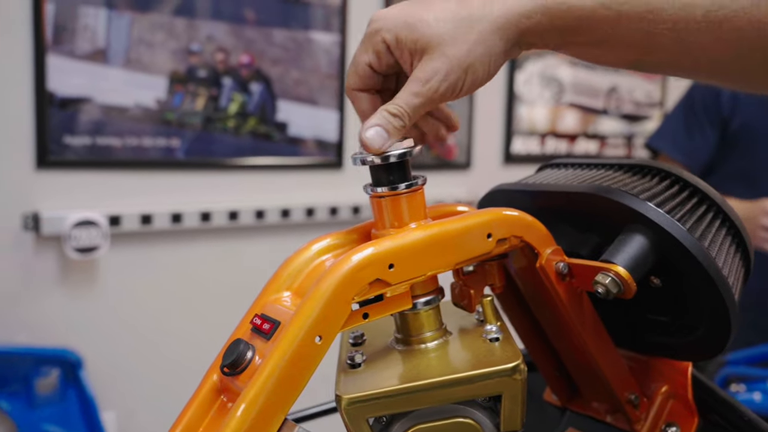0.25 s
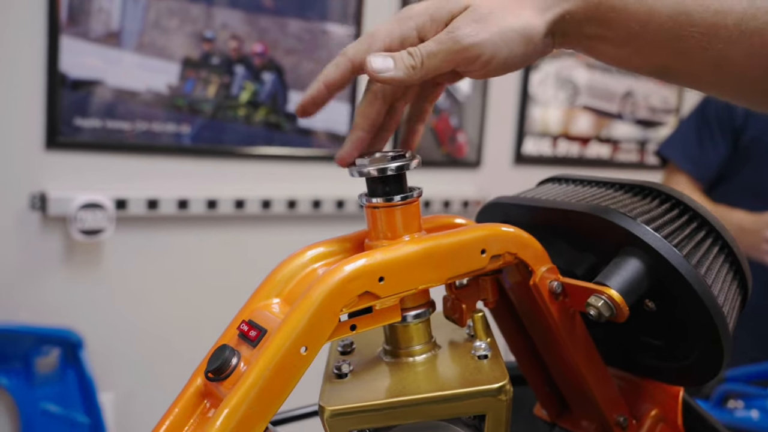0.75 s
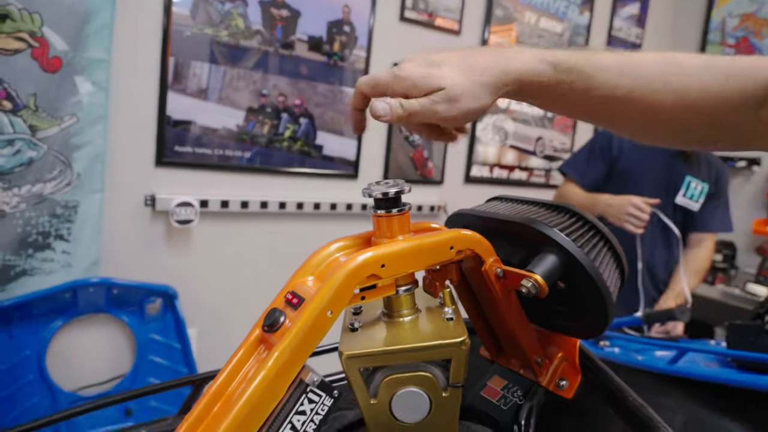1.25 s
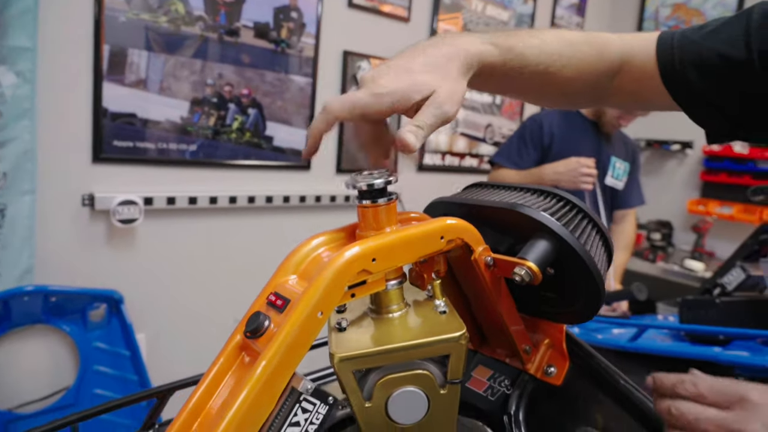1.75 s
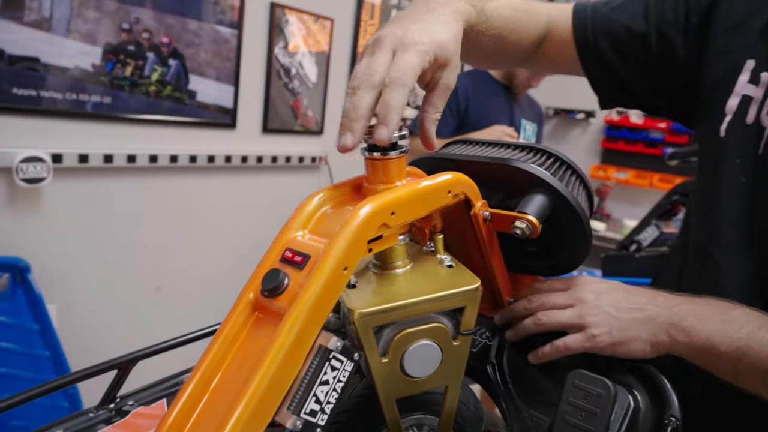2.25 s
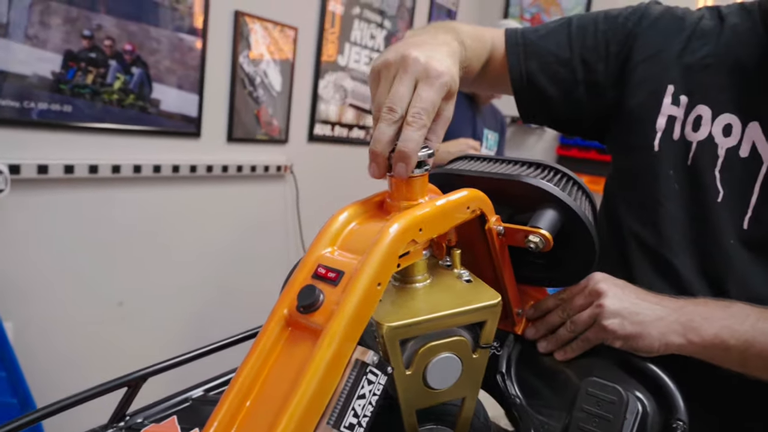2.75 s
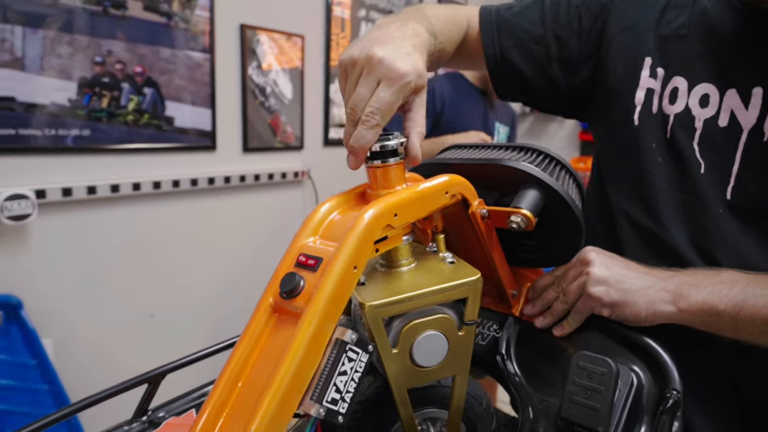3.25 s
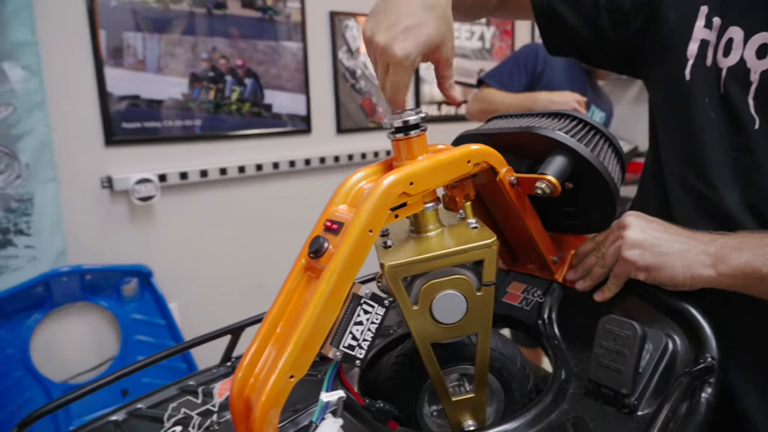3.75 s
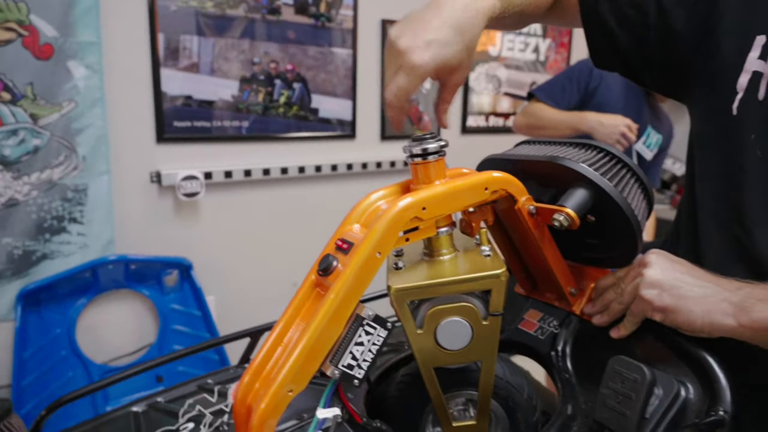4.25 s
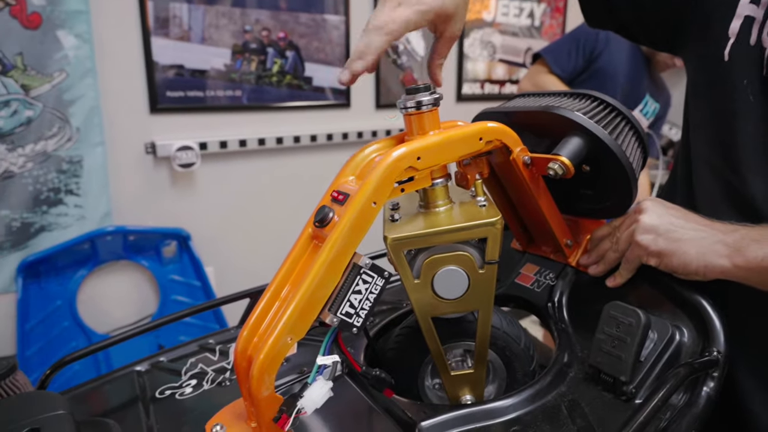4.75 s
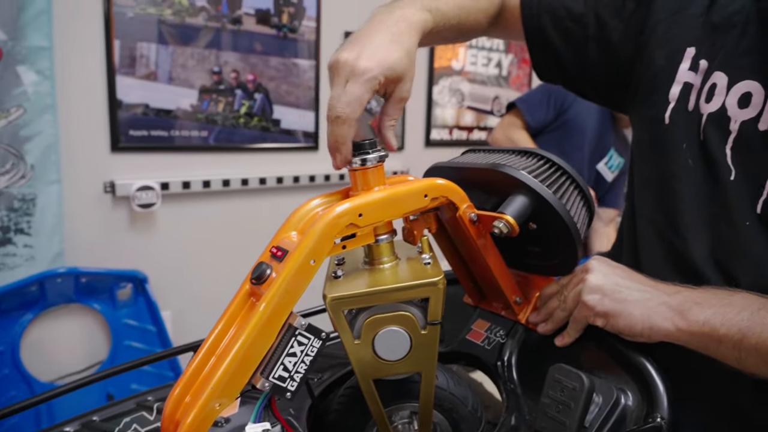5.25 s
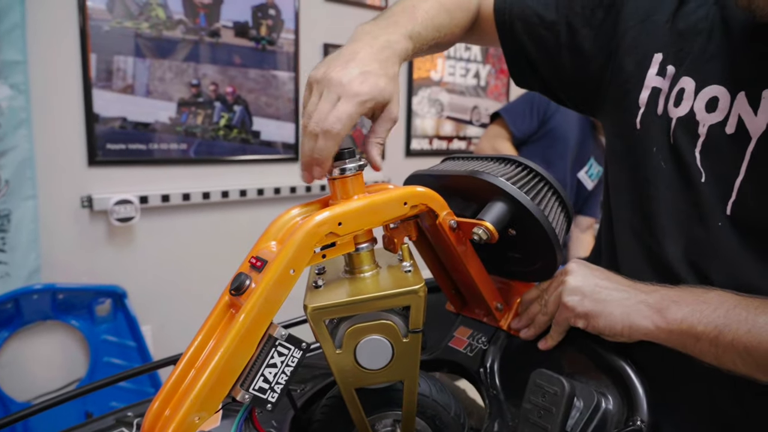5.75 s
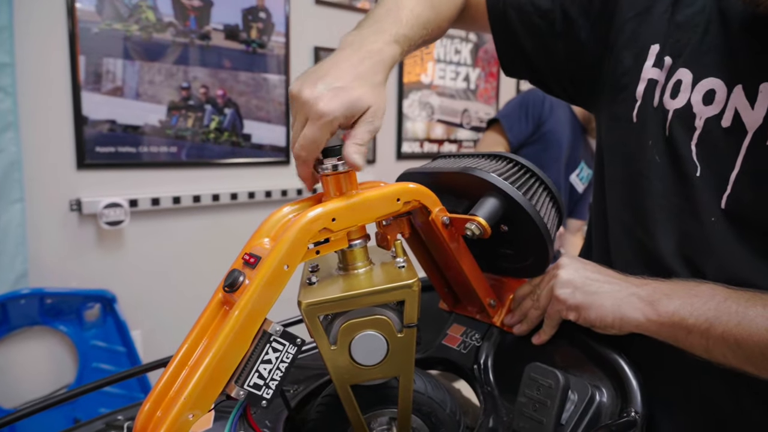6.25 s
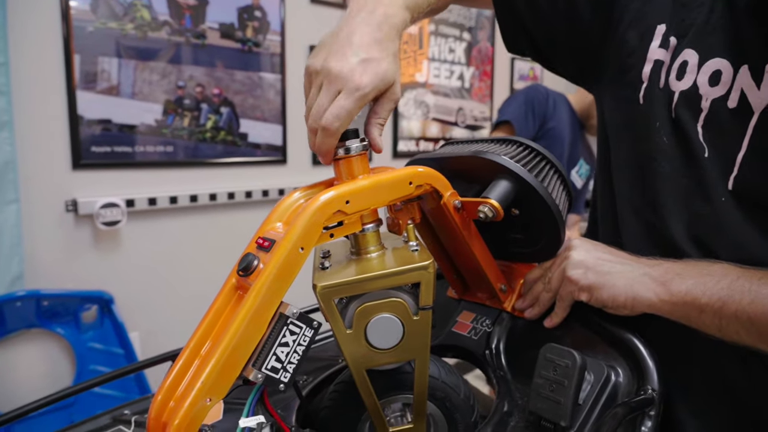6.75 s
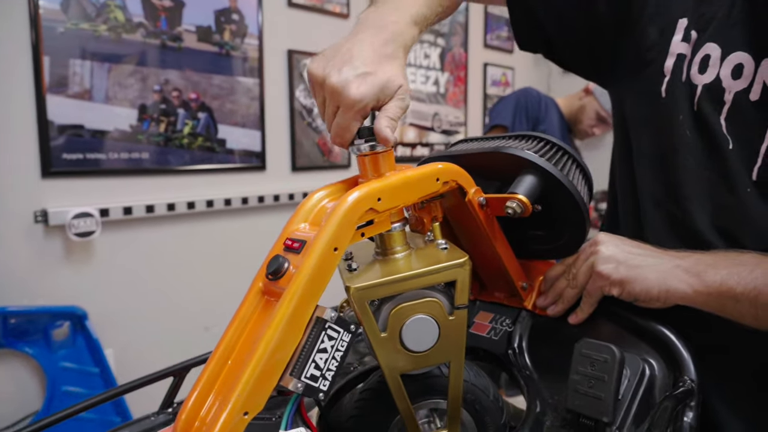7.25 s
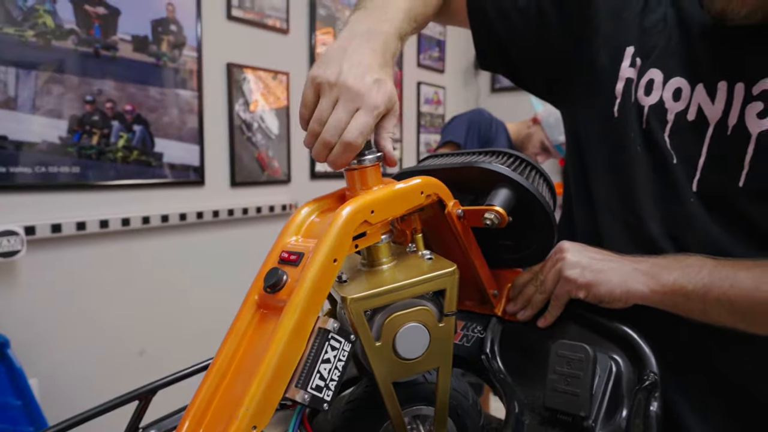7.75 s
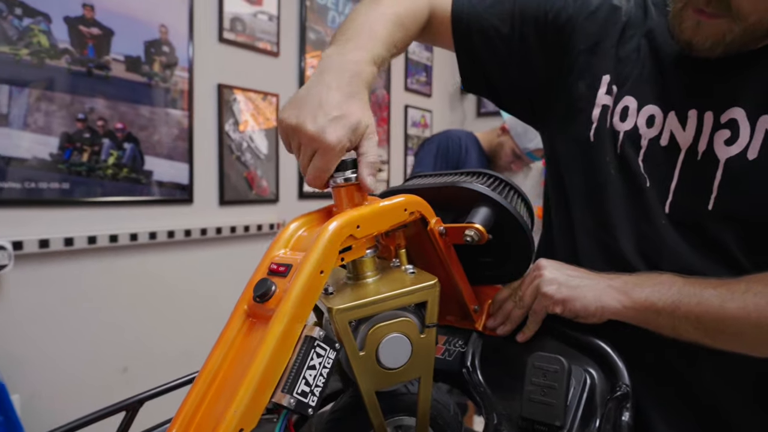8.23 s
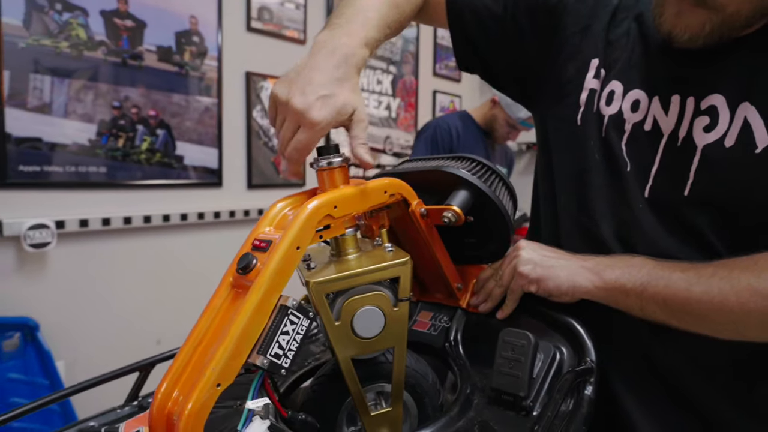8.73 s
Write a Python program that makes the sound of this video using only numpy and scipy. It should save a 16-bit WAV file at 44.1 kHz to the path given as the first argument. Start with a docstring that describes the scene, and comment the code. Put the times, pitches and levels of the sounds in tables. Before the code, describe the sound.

Loose metallic clacks and rattling, rasping spins of a nut on a shaft give way to dull gripped rubs, small squeaks and frame thumps.

```python
"""In a small workshop, a steel nut is spun down a greased threaded shaft on a kart frame.
Flicked, it clacks in the play of its thread and coasts with a fine rasp; later it is turned
in short gripped strokes that rub, squeak and thump through the frame.
Impacts and random grains drive resonances of nut, skin and frame; squeaks are gliding noise bands.
Wall reflections are added, over a steady air noise, a distant fan and a late hum."""
import sys
import numpy as np
from scipy import signal
from scipy.fft import rfft, irfft, next_fast_len
from scipy.io import wavfile
from scipy.ndimage import uniform_filter1d, map_coordinates

SR = 44100
rng = np.random.default_rng(int(sys.argv[2]) if len(sys.argv) > 2 else 0)


def transcribe(signal):
    """Save signal, clipped to [-1, 1], as a 16-bit WAV file at the path in sys.argv[1]."""
    frames = np.atleast_2d(signal).T
    limited = np.clip(frames, -1, 1)
    pcm = np.round(limited * 32767).astype(np.int16)
    wavfile.write(sys.argv[1], SR, pcm)


N = 396263
TIME_S = np.arange(N) / SR
BINS_HZ = np.fft.rfftfreq(8192, 1 / SR)

# Gripped strokes: t/s, length/s, skin rub level/dB, frame rumble level/dB, thread hiss level/dB
STROKES = [(0.045, 0.038, -38, -37, -50), (0.14, 0.073, -51, -45, -45), (0.22, 0.12, -38.5, -39.5, -42),
           (2.5, 0.11, -56, -51, -55), (2.82, 0.14, -50.5, -55, -62), (3.11, 0.066, -49, -38.5, -60),
           (3.215, 0.15, -59, -75, -54), (3.34, 0.078, -64, -65, -43), (5.195, 0.042, -44, -54, -40),
           (5.435, 0.081, -48, -39.5, -52), (5.56, 0.069, -41.5, -45.5, -40.5), (5.67, 0.17, -59, -68, -55),
           (5.8, 0.096, -38, -31.5, -43.5), (6.06, 0.11, -53, -38, -46), (6.32, 0.061, -41.5, -37.5, -64),
           (6.39, 0.16, -48, -40.5, -47.5), (6.745, 0.081, -37, -37, -41.5), (7.07, 0.13, -60, -45.5, -53),
           (7.16, 0.1, -45, -46.5, -46), (7.455, 0.078, -40, -36.5, -45.5), (7.72, 0.14, -55, -41.5, -52.5),
           (7.81, 0.091, -46.5, -43, -49.5), (8.1, 0.13, -53, -47.5, -58.5),
           (8.19, 0.11, -45.5, -36, -48.5), (8.555, 0.096, -36.5, -30, -48), (8.89, 0.045, -66, -42, -53.5)]
# Flicks that set the nut coasting: t/s, time until a finger stops it/s, rasp level/dB, rattle level/dB
FLICKS = [(0.16, .19, -51, -43), (0.535, 0.3, -45, -36.5), (0.777, 0.27, -43.5, -43),
          (0.99, 0.11, -61, -47), (1.225, 0.21, -41, -40), (1.47, 0.11, -42.5, -32), (1.75, 0.15, -47, -31),
          (1.99, 0.275, -42.5, -40.5), (3.521, 0.26, -43, -44), (3.74, 0.19, -47, -45),
          (3.952, .21, -45, -47.5), (4.16, 0.27, -44, -45.5), (4.392, 0.25, -44.5, -45),
          (4.615, 0.26, -47.5, -45), (4.83, 0.32, -47, -44)]
# Soft pushes of the hand on the frame, before common trim: t/s, level/dB, centre f/Hz
THUMPS = [(0.261, -20, 386), (1.766, -25.5, 223), (2.396, -28, 134), (3.123, -20, 270), (3.167, -15.5, 227),
          (3.745, -21.5, 275), (3.95, -18.5, 239), (4.395, -14.5, 270), (4.617, -15, 235), (4.83, -17, 251),
          (5.241, -19, 282), (6.114, -18.5, 274), (6.508, -23.5, 260), (7.515, -19, 250), (7.773, -26, 233),
          (7.87, -28, 230), (8.234, -28.5, 235)]
# Nut against thread flank, before common trims: t/s, level/dB, treble re level/dB, frame knock re level/dB
CLACKS = [(0.519, -29.5, -16, -4), (0.531, -14.5, -12, -5), (0.5706, -21, -7, -5), (0.607, -31, -3, -12),
          (0.6702, -22.5, -19, -4.5), (0.779, -21.5, -11, -4.5), (0.991, -20, -1, -4),
          (1.219, -23, -20, -2), (1.271, -22.5, -2, 0.5), (1.381, -25.5, -21, -25), (1.4697, -21, -5, -2),
          (1.5137, -22.5, 6, -4), (1.5424, -15.5, 7, -22), (1.5492, -6, -15, -34), (1.5568, -4.5, 1, -6),
          (1.7447, -10, -7.5, -11), (1.764, -11, -4.5, -7), (1.8294, -17, -24, -20), (1.8745, -22, -23, -9),
          (1.9832, -28, -8, 4), (1.9957, -19, -20, 1), (2.041, -19, -6, -25), (3.2247, -45.5, 14, 0),
          (3.5159, -20.5, -6.5, -4.5), (3.5745, -23, -29, -9), (3.74, -25, -5, -1), (3.9457, -13.5, 3, -9),
          (4.162, -24.5, -19, -1.5), (4.2053, -23.5, -29, -20), (4.4024, -21, -18, -0.5),
          (4.6142, -8.5, 1.5, -6), (4.8264, -9.5, -1, -9.5), (5.032, -15.5, 1, -1.5), (5.0807, -17, 2, -11),
          (5.0912, -14.5, -2.5, -1.5), (5.2371, -27, -11, 2.5), (5.676, -34, -24, -5),
          (5.803, -31.5, -16, 3), (5.826, -18.5, -14, -19), (6.0529, -17, -3.5, -4),
          (6.084, -11.5, -9, -25), (6.268, -23.5, -13, -7), (6.3365, -17, -9, -8), (6.39, -25, -26, -5),
          (6.4425, -27, -30, -15), (6.743, -31, -25, -9), (6.776, -23.5, -22, -7), (7.0658, -22, -13, -6),
          (7.1002, -16, 0, -12), (7.198, -35, -26, -11), (7.431, -36.5, -32, 0), (7.7198, -32.5, -9, -4),
          (8.094, -31.5, -23, 0.5)]
# Single nut modes after a clean flick: t/s, level/dB, f/Hz, time to fall by 66.6 dB/s
PINGS = [(1.5495, -5.5, 2010, 0.031), (1.56, -24.5, 9760, 0.15), (1.748, -26, 2030, 0.018),
         (3.947, -2, 1827, 0.027), (5.085, -19, 9730, 0.036), (6.081, -30, 1740, 0.033)]
# Skids of fingertips and thread on steel: t/s, length/s, level/dB, start f/Hz, end f/Hz, width/Hz
SLIPS = [(2.01, 0.033, -38, 8000, 5500, 3500), (2.835, .1, -57, 3540, 3150, 1400),
         (4.148, 0.093, -47, 1547, 1465, 1790), (4.289, 0.078, -43.5, 3400, 2220, 2100),
         (4.296, 0.094, -42.5, 1850, 988, 453), (4.378, 0.094, -43.5, 1453, 1273, 1930),
         (5.068, 0.02, -39, 9500, 9700, 6000), (5.467, 0.026, -45.5, 1173, 1064, 1600),
         (5.583, 0.034, -48, 1477, 1440, 2020), (6.412, 0.058, -39.5, 1248, 877, 600),
         (6.754, 0.051, -32.5, 1075, 1275, 109), (7.105, 0.057, -39, 1254, 1093, 140),
         (7.19, 0.03, -35, 1157, 1086, 140), (8.554, 0.079, -38.5, 1340, 1450, 68)]

# Resonances, relative levels: f/Hz, nominal width/Hz, level/dB
# nut and shaft
NUT_MODES = [(1150, 320, -6.5), (1384, 7.5, -3), (1740, 220, -7), (1817, 45, 1.5), (1974, 225, 2),
             (2743, 244, -6.5), (3130, 620, -12), (3830, 180, -11.5), (5180, 500, -9.5), (5510, 50, -4),
             (5950, 190, -7), (6430, 120, -8.5), (7200, 590, -5), (9600, 146, -16), (11000, 270, -18),
             (11800, 110, -20), (12400, 250, -17), (14900, 56, -26)]
# frame
FRAME_MODES = [(240.4, 43.5, -4), (270, 140, 3.5), (340, 99, -5.5), (421.8, 21, 7.5), (530.6, 13, -0.5),
               (600.6, 17, -0.5), (826, 14, 5.5), (882, 45, -9)]
# nut held in the fingers
HELD_MODES = [(785, 220, 13), (996, 340, 12.5), (1192, 26, 8), (1270, 18, 25), (1650, 300, 9.5),
              (1930, 230, 4), (2446, 113, 11.5), (3500, 600, -26.5)]
# frame with the hand pressing the nut onto it
PRESSED_MODES = [(252.8, 41, 4.5), (366, 16, 1), (415, 120, 0.5), (516, 87, -2.5), (600, 36, -17),
                 (748, 47, -8.5), (847, 18, -15.5)]
# narrow modes of the freely turning nut
SINGING_MODES = [(1586, 40, 10), (2128, 77, 9), (4130, 69, -8), (5270, 120, -3), (7180, 140, -15),
                 (9930, 120, -2.5)]

# Contact force spectra, relative levels: f/Hz, level/dB
# nut striking the thread
CLACK_FORCE = [(100, -13), (300, -4), (700, 5), (1200, 8), (1900, 5), (3000, 2), (4000, 8), (7500, 1),
               (9500, -3), (12500, -7), (16000, -13)]
# nut skating on the thread
RASP_FORCE = [(100, -32), (350, 28), (800, 9), (1400, 9.5), (1850, 2.5), (2200, 11.5), (3000, -1),
              (4400, 4.5), (5200, 6.5), (7400, -3.5), (8500, 5), (10000, 1), (16000, 14)]
# greased thread under a grip
HISS_FORCE = [(1500, -2), (3000, 0.5), (5000, 2.5), (7500, -4), (9500, -5), (16000, 4)]
# shock reaching the frame
FRAME_FORCE = [(40, -38), (100, -39), (160, -6.5), (230, -1.5), (500, 2), (900, 1), (1600, -66),
               (5000, -77)]
# fingertip skin
SKIN_FORCE = [(100, -14), (500, 2.5), (900, 12.5), (2500, 4.5), (5000, -14), (12000, -22)]
# pressed frame
PRESS_FORCE = [(60, -56), (170, -20), (225, 3.5), (500, 1), (880, 0), (1400, -31), (5000, -64)]

# Workshop air, spectrum shape: f/Hz, relative density level/dB
AIR_SHAPE = [(15, -45), (25, -7.5), (86, -13.5), (228, -0.5), (291, -3), (557, -5.5), (691, -8), (769, -8),
             (1120, -12.5), (1320, -15.5), (2200, -19), (4330, -24.5), (5090, -25.5), (14600, -27.5),
             (15800, -29)]
# Distant fan: f/Hz, rms level/dB
FAN_TONES = [(752, -76), (1128, -69.5), (1504, -72), (2256, -72)]
# Faint hum that comes up late: t/s, rms level/dB
HUM_LEVEL = [(0, -78.5), (6.9, -70), (7.3, -65), (8.3, -62), (9, -69)]
# Reach of the nut into the deepest frame modes: t/s, gain level/dB
SEATING = [(0, -23), (1.0, -4.5), (1.6, -3), (3.1, 1.5), (5.9, -4.5), (7.5, 6), (9, 3.5)]
# Room decay: f/Hz, t60/s
ROOM_DECAY = [(150, 0.29), (400, 0.29), (1000, 0.21), (2800, 0.22), (7300, 0.15), (14000, 0.26)]

SPIN_UP_S, DRAG_DB_PER_S, STOP_S = 0.004, 34.5, 0.02  # flick rise, grease drag, finger stop
REBOUND_S, REBOUND_DB, REBOUND_SPREAD_DB = 0.036, 3.5, 6.5  # typical spacing, level re rattle, spread
BITE_S = 0.00079  # build-up time constant of a contact through the grease


def amp(db):
    """Decibels to gain."""
    return 10 ** (np.asarray(db) / 20)


def unit(x):
    """Scales to rms 1."""
    return x / np.sqrt(np.mean(x ** 2) + 1e-20)


def read(points, hz):
    """Interpolates (f/Hz, value) points on a log-frequency axis."""
    point_hz, value = np.transpose(points)
    return np.interp(np.log(hz + 1), np.log(point_hz + 1), value)


def add(mix, start_s, sound):
    """Mixes a sound in at a time, cut at the end of the mix."""
    part = mix[max(round(start_s * SR), 0):][:len(sound)]
    part += sound[:len(part)]


def wander(rate_hz):
    """Smooth random curve of rms 1, with a Gaussian limit on its rate."""
    size = 4096
    hz = np.arange(size // 2 + 1) * SR / N
    slow = irfft(rfft(rng.standard_normal(size)) * np.exp(-(hz / rate_hz) ** 2))
    return unit(np.interp(np.arange(N), np.linspace(0, N, size), slow))


def grains(per_s, spread_db):
    """Tiny collisions of rough surfaces, random in time, sign and size."""
    size = amp(spread_db * np.minimum(rng.exponential(1, N), 3.5))
    return size * rng.choice([-1, 1], N) * (rng.random(N) < per_s / SR)


def body(modes, force, shade=1, skirt=1):
    """Minimum-phase response of resonances under a contact force; skirt deepens the valleys."""
    power = sum(amp(db) ** 2 / (1 + (2 * (BINS_HZ - hz) / width_hz) ** 2) ** skirt
                for hz, width_hz, db in modes)
    log_gain = np.log(np.sqrt(power) * amp(read(force, BINS_HZ)) * shade + 1e-6)
    circle = np.concatenate([log_gain, log_gain[-2:0:-1]])
    return np.fft.ifft(np.exp(np.conj(signal.hilbert(circle)))).real[:len(BINS_HZ)]


def nut_halves(force, split_hz, skirt):
    """The nut's low rocking modes and high ringing modes, as two responses."""
    low = 1 / (1 + (BINS_HZ / split_hz) ** 8)
    rocking = body(NUT_MODES, force, np.sqrt(low))
    ringing = body(NUT_MODES, force, np.sqrt(1 - low), skirt)
    return rocking, ringing


def ring(drive, response):
    """A drive sounding through a body, at rms 1."""
    return unit(signal.oaconvolve(drive, response)[:N])


def blow(response, contact_s, scatter, noise):
    """Impact plus dying chatter through a body, scaled by its loudest 2 ms."""
    t_s = np.arange(len(noise)) / SR
    u = t_s / contact_s
    chatter = noise * np.sqrt(u) * np.exp(-u)
    drive = scatter * chatter / np.linalg.norm(chatter) + (t_s == 0)
    sound = signal.fftconvolve(drive, response)
    sound *= 1 - np.exp(-TIME_S[:len(sound)] / BITE_S)
    return sound / np.sqrt(2 * uniform_filter1d(sound ** 2, size=90).max())


def gestures(table, shape, axis, lag_s=0, stretch=1):
    """Gain over time: one shape per row, as strong as the row's dB column."""
    gain = np.zeros(N)
    for row in table:
        add(gain, row[0] + lag_s, amp(row[axis]) * shape(row[1] * stretch))
    return gain


def travelling(x, share=0.0024, rate_hz=9):
    """Resonances bend slightly as the contact point goes round the thread."""
    place = np.cumsum(1 + share * wander(rate_hz))
    return map_coordinates(x, [place], order=3, mode="mirror")


def swelling(x, edges_hz, depth_db, rate_hz):
    """Splits a sound into mode groups that swell and fade independently."""
    size = next_fast_len(N)
    group = np.searchsorted(edges_hz, np.fft.rfftfreq(size, 1 / SR))
    spectrum = rfft(x, size)
    return [irfft(spectrum * (group == k), size)[:N] * amp(depth_db * wander(rate_hz))
            for k in range(len(edges_hz) + 1)]


def air(level_db=-49.5):
    """Ventilation and fine hiss: steady shaped noise."""
    spectrum = rfft(rng.standard_normal(N)) * amp(read(AIR_SHAPE, np.fft.rfftfreq(N, 1 / SR)))
    return amp(level_db) * unit(irfft(spectrum, N))


def tones(hum_hz=125, waver_rad=1.0):
    """Fan whine and low hum: sines wavering slightly in phase."""
    drift_rad = waver_rad * wander(rate_hz=2.1)
    fan = sum(amp(db) * np.sin(2 * np.pi * hz * TIME_S + (k + 2) * drift_rad)
              for k, (hz, db) in enumerate(FAN_TONES))
    hum_gain = amp(np.interp(TIME_S, *np.transpose(HUM_LEVEL)))
    hum = hum_gain * np.sin(2 * np.pi * hum_hz * TIME_S + 2 * drift_rad)
    return np.sqrt(2) * (fan + hum)


def press(length_s, power=0.73):
    """Finger pressure over one stroke: a smooth arch."""
    return abs(np.sin(np.pi * np.arange(0, 1, 1 / (length_s * SR)))) ** power


def gripping(judder_db=6.0, rumble_lag_s=0.0046, rumble_stretch=1.17):
    """Skin and greased thread stick and slip; the frame rumbles slightly later and longer."""
    judder = amp(judder_db * wander(rate_hz=15))
    rub = ring(judder * grains(per_s=800, spread_db=1.5), body(HELD_MODES, SKIN_FORCE, skirt=1.57))
    rumble = ring(grains(per_s=1300, spread_db=1.5), body(PRESSED_MODES, PRESS_FORCE, skirt=1.2))
    hiss = ring(judder * grains(per_s=9500, spread_db=3.5), body(NUT_MODES, HISS_FORCE))
    rumble_gain = gestures(STROKES, press, axis=3, lag_s=rumble_lag_s, stretch=rumble_stretch)
    return (gestures(STROKES, press, axis=2) * rub
            + rumble_gain * rumble
            + gestures(STROKES, press, axis=4) * hiss)


def spin(length_s):
    """Nut speed after one flick: quick rise, steady drag, then a finger stops it."""
    t_s = TIME_S[:SR // 2]
    rise = 1 - np.exp(-t_s / SPIN_UP_S)
    stop = np.exp(-np.maximum(t_s - length_s, 0) / STOP_S)
    return rise * amp(-DRAG_DB_PER_S * t_s) * stop


def coasting(frame_db=-6, wobble_db=2.0, swell_db=2.0, brighten_power=0.11):
    """The free nut skates on the thread: grains drive its modes, whose groups swell independently."""
    low, high = nut_halves(RASP_FORCE, split_hz=3600, skirt=1.4)
    wobble = amp(wobble_db * wander(rate_hz=48))
    coarse = unit(grains(per_s=460, spread_db=-1.0))
    fine = unit(grains(per_s=4500, spread_db=8.0))
    whirr = ring(wobble * (fine + 0.4 * coarse), high)
    rocking = ring(wobble * (coarse + 0.86 * fine), low)
    whirr = swelling(travelling(whirr), [5750, 8600, 11500], swell_db, rate_hz=12)
    rocking = swelling(travelling(rocking, share=0.02), [1550, 1980], swell_db, rate_hz=16)
    speed = gestures(FLICKS, spin, axis=2)
    bite = (speed / speed.max()) ** brighten_power  # a faster nut wakes more of its top modes
    rasp = unit(sum(whirr[:2]) + 0.89 * bite * sum(whirr[2:]))
    rattle = unit(sum(rocking)) + amp(frame_db) * ring(coarse, body(FRAME_MODES, FRAME_FORCE))
    return speed * rasp + gestures(FLICKS, spin, axis=3) * rattle


def singing(level_db=-47, swell_db=5):
    """Thin metallic ring of narrow modes, in proportion to nut speed."""
    speed = gestures(FLICKS, spin, axis=2)
    flat_force = [(0, 0), (SR, 0)]
    song = ring(grains(per_s=4200, spread_db=1.5), body(SINGING_MODES, flat_force, skirt=1.6))
    song = sum(swelling(travelling(song), [3000, 6000, 8500], swell_db, rate_hz=8))
    return amp(level_db) * speed / speed.max() * unit(song)


def rebounds(treble_db=-7, knock_db=-5, jitter=0.3, scatter=1.13, chatter_s=0.0086):
    """The coasting nut ticks from flank to flank, unevenly and on average ever more softly."""
    low, high = nut_halves(CLACK_FORCE, split_hz=2400, skirt=1.0)
    parts = [(low, 0), (high, treble_db), (body(FRAME_MODES, FRAME_FORCE), knock_db)]
    out = np.zeros(N)
    for (start_s, length_s, _, db), draws in zip(FLICKS, rng.standard_normal((len(FLICKS), 12, 1500))):
        delays_s = np.cumsum(REBOUND_S * np.exp(jitter * draws[:, 0]))
        for delay_s, noise in zip(delays_s[delays_s < length_s], draws):
            spread_db = REBOUND_SPREAD_DB * np.clip(noise[1], -2, 2)
            tick_db = db + REBOUND_DB - DRAG_DB_PER_S * delay_s + spread_db
            tick = sum(amp(tick_db + part_db) * blow(part, chatter_s, scatter, noise)
                       for part, part_db in parts)
            add(out, start_s + delay_s, tick)
    return out


def thumps(trim_db=-4, width_octaves=0.64, pad_contact_s=0.0029):
    """Fingertips push the frame; the soft pad wakes modes around one frequency."""
    out = np.zeros(N)
    for (start_s, db, hz), noise in zip(THUMPS, rng.standard_normal((len(THUMPS), 3000))):
        pad = 1 / (1 + (np.log2((BINS_HZ + 1) / hz) / width_octaves) ** 2) ** 2
        response = body(FRAME_MODES, FRAME_FORCE, pad)
        add(out, start_s, amp(db + trim_db) * blow(response, pad_contact_s, 1.0, noise))
    return out


def clacks(low_db=-4, treble_db=-6.0, knock_db=-3, knock_lag_s=0.00266, scatter=1.39,
           low_chatter_s=0.0045, treble_chatter_s=0.0024, knock_chatter_s=0.012):
    """The nut hits the thread flank; the shock then runs down the shaft into the frame."""
    low, high = nut_halves(CLACK_FORCE, split_hz=3540, skirt=1.0)
    frame, out = body(FRAME_MODES, FRAME_FORCE), np.zeros(N)
    for (start_s, db, treble, knock), noise in zip(CLACKS, rng.standard_normal((len(CLACKS), 3000))):
        add(out, start_s, amp(db + low_db) * blow(low, low_chatter_s, scatter, noise))
        add(out, start_s, amp(db + treble + treble_db) * blow(high, treble_chatter_s, scatter, noise))
        knock_gain = amp(db + knock + knock_db)
        add(out, start_s + knock_lag_s, knock_gain * blow(frame, knock_chatter_s, 0.98, noise))
    return out


def pings(rise_s=0.0019):
    """Single nut modes ring on after a flick: decaying sines."""
    t_s, out = TIME_S[:SR // 2], np.zeros(N)
    for start_s, db, hz, fall_s in PINGS:
        envelope = 0.00047 ** (t_s / fall_s) * (1 - np.exp(-t_s / rise_s))
        add(out, start_s, amp(db) * envelope * np.sin(2 * np.pi * hz * t_s))
    return out


def slipping(lowest_hz=330):
    """Skin sticks and slips on steel: a gliding band, squeak if narrow, swish if wide."""
    out = np.zeros(N)
    noises = rng.standard_normal((len(SLIPS), 2, SR // 4))
    for (start_s, length_s, db, start_hz, end_hz, width_hz), noise in zip(SLIPS, noises):
        size = min(int(length_s * SR), SR // 4)
        lowpass = signal.butter(2, width_hz / 2, fs=SR, output="sos")
        flutter = signal.sosfilt(lowpass, noise[0] + 1j * noise[1])[-size:]
        # complex carrier moves the noise up to the gliding centre
        carrier = np.exp(2j * np.pi * np.cumsum(np.geomspace(start_hz, end_hz, size)) / SR)
        band = (flutter * carrier).real * signal.windows.tukey(size, 0.7)
        add(out, start_s, amp(db) * unit(band))
    return signal.sosfilt(signal.butter(3, lowest_hz, "highpass", fs=SR, output="sos"), out)


def seat(x, deep_hz=290):
    """Coupling to the deepest frame modes varies, growing overall as the nut nears its seat."""
    deep = signal.sosfiltfilt(signal.butter(4, deep_hz, fs=SR, output="sos"), x)
    return x + (amp(np.interp(TIME_S, *np.transpose(SEATING))) - 1) * deep


def reflections(build_s):
    """Dense reflections from the workshop walls, each band dying at its own speed."""
    size = SR // 2
    taps = rng.choice([-1., 1.], size) * (rng.random(size) < 4000 / SR)  # 4000 echoes per s
    hz, t_s, z = signal.stft(taps, SR, nperseg=256)
    decay = 1e-3 ** (t_s / read(ROOM_DECAY, hz)[:, None])
    tail = signal.istft(z * decay, SR, nperseg=256)[1][:size]
    tail *= 1 - np.exp(-(TIME_S[:size] / build_s) ** 2)
    return tail / np.linalg.norm(tail)


def room(x, wet_db=-6.0, build_s=0.0014, cycle_hz=0.6, count=3):
    """Wall reflections; one pattern gives way to the next, cyclically."""
    phases = cycle_hz * TIME_S - np.arange(count)[:, None] / count
    shares = np.maximum(np.cos(2 * np.pi * phases), 0)
    shares /= np.linalg.norm(shares, axis=0)
    wet = sum(signal.oaconvolve(x * share, reflections(build_s))[:N] for share in shares)
    return x + amp(wet_db) * wet


def scene():
    """Nut, hand and frame in the room, over air and tones."""
    coupled = seat(clacks() + rebounds() + coasting() + gripping())
    nut = coupled + singing() + pings() + slipping()
    return (room(nut + thumps()) + air() + tones())[None]


def record(dry, full_scale=0.92, edge_hz=15950):
    """Rounds off peaks towards full scale, then limits the band."""
    limited = dry / (1 + (dry / full_scale) ** 6) ** (1 / 6)
    lowpass = signal.firwin(511, edge_hz, window=("kaiser", 9), fs=SR)
    return signal.oaconvolve(limited, lowpass[None], "same")


dry = scene()
out = record(dry)
transcribe(out)
```